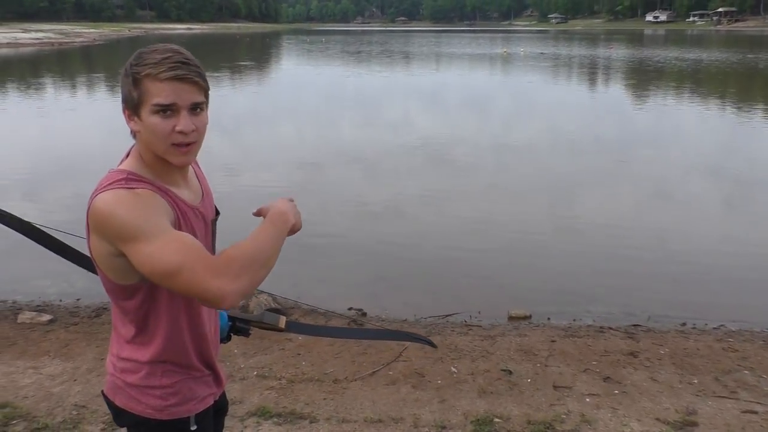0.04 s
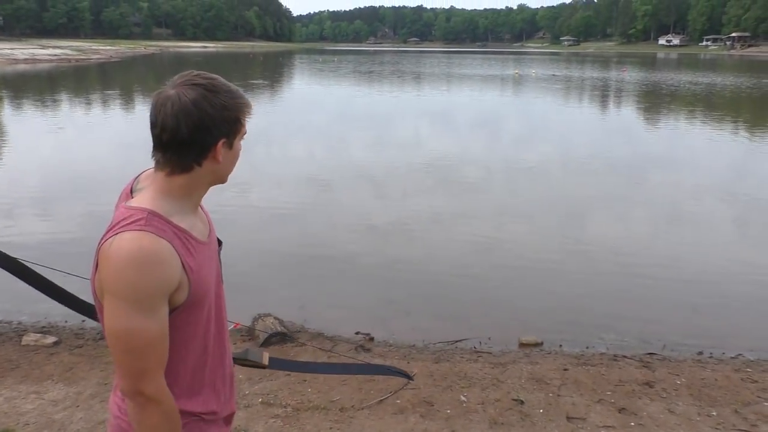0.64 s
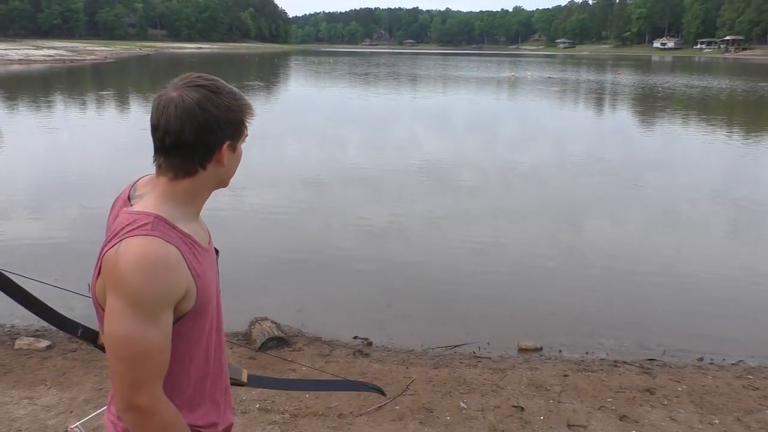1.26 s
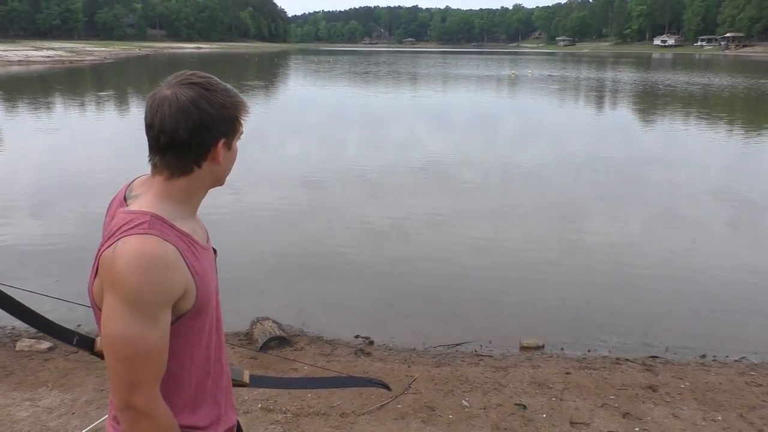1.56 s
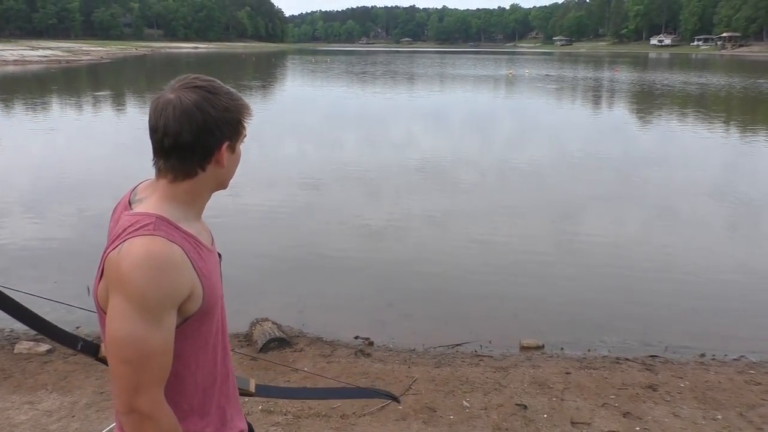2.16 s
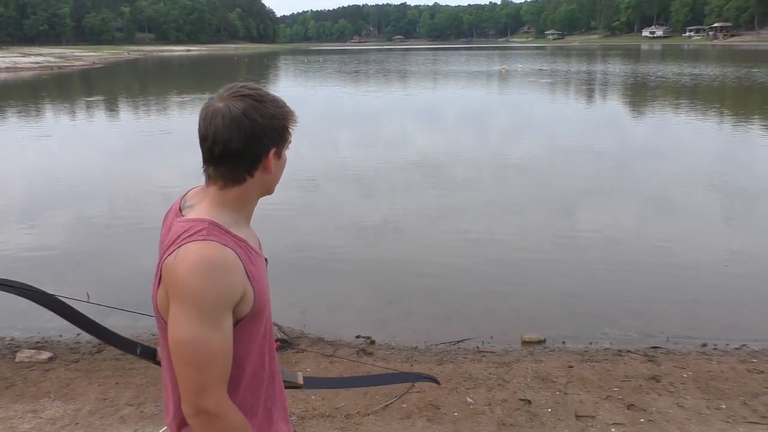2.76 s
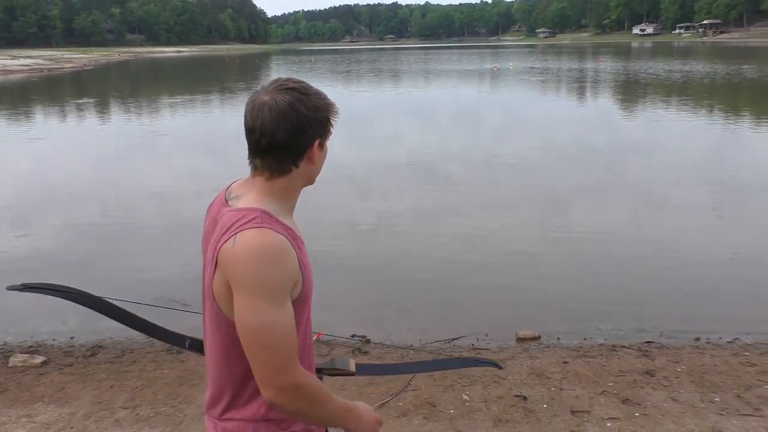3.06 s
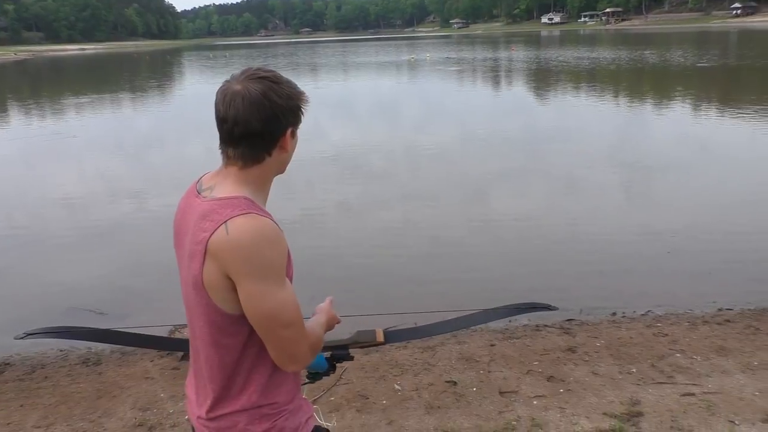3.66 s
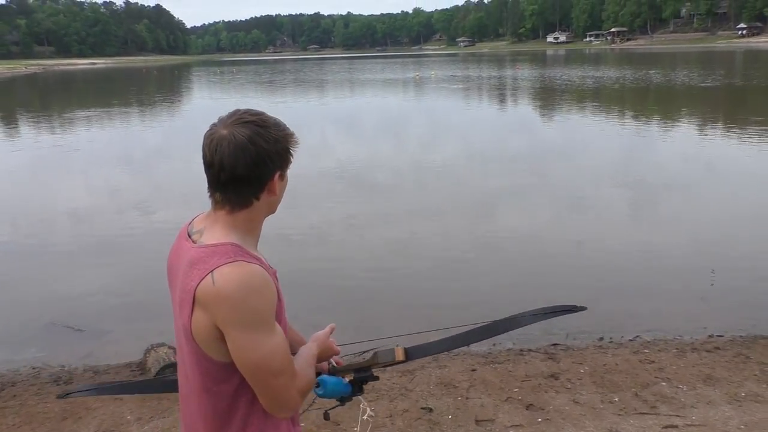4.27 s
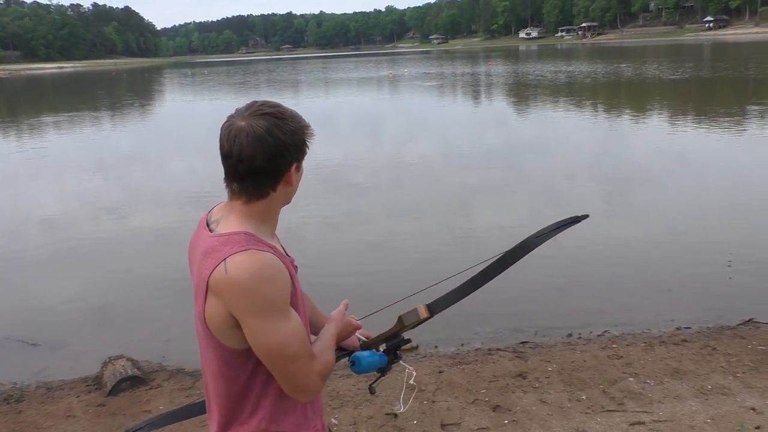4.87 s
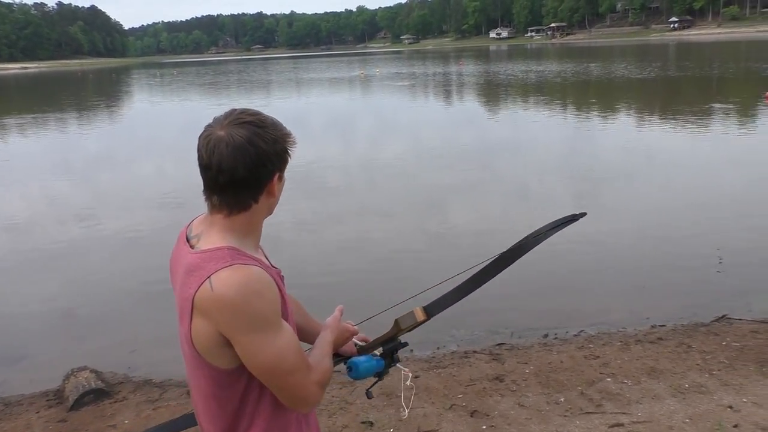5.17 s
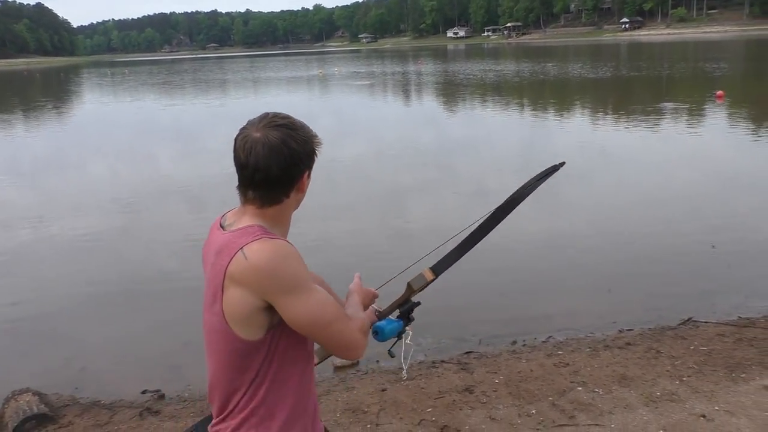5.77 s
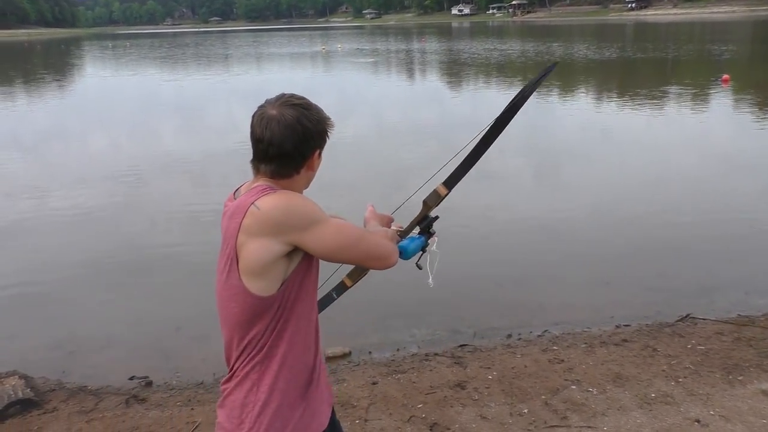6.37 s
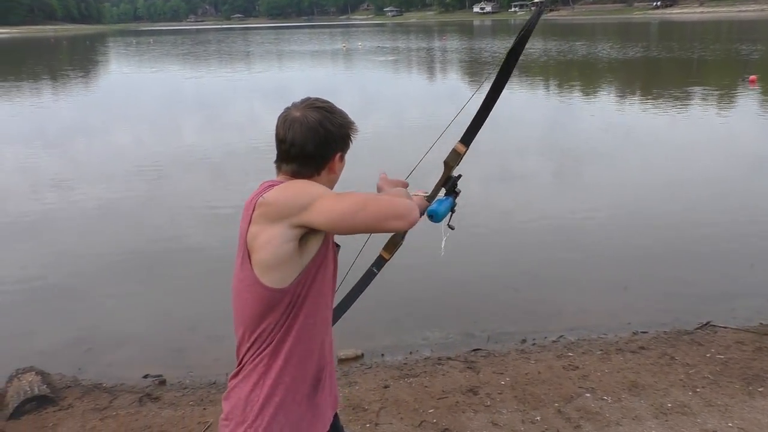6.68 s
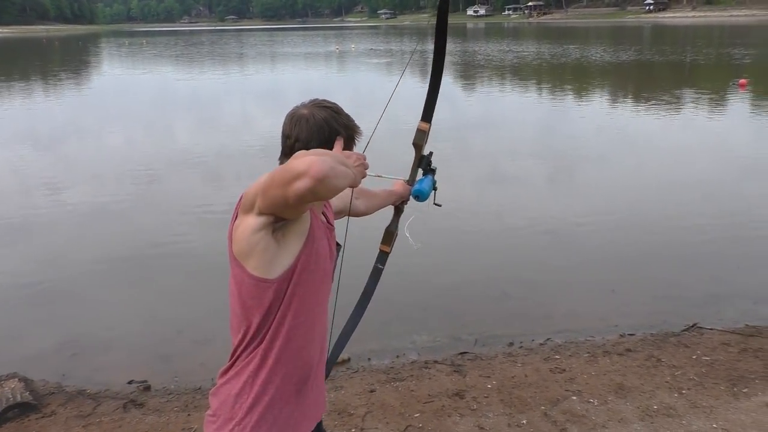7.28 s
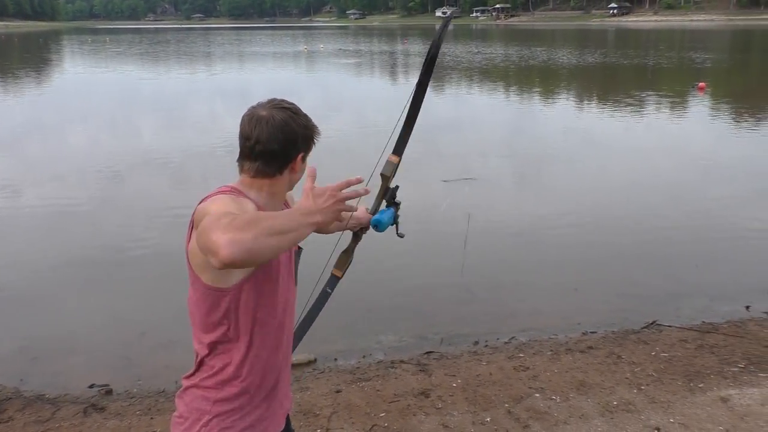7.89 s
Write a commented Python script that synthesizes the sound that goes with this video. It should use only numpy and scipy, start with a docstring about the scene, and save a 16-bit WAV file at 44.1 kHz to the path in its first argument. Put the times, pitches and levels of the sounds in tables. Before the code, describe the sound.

Short crow calls, faint birds and wind rumble, with close clicks from a bow's reel, ending in a sharp shot and whirring line.

```python
"""A lake shore: crows call with short nasal notes over a low rumble of wind, small birds and insects
behind them, and the trees and banks scatter the birds' calls back as echoes. Close by, an archer
handles a fishing bow, its reel clicking, then shoots. Friction makes the arrow scrape over the rest,
the string slaps home and excites the modes of the limbs, and the line whizzes off the reel,
each loop flicking the cover."""
import sys
import numpy as np
from scipy import signal
from scipy.fft import rfft, irfft, next_fast_len
from scipy.io import wavfile

SR = 44100
rng = np.random.default_rng(int(sys.argv[2]) if len(sys.argv) > 2 else 0)


def generate_wav(signal):
    """Clip the signal to [-1, 1] and save it as 16-bit WAV at the path in sys.argv[1]."""
    frames = np.transpose(np.atleast_2d(signal))
    scaled = np.clip(frames, -1, 1) * 32767
    pcm = np.round(scaled).astype(np.int16)
    wavfile.write(sys.argv[1], SR, pcm)


N = 349757
TIME = np.arange(N) / SR

# Spectrum of the reel's ticks and the line's scrapes. Each row: frequency in Hz, relative level in dB.
TICK_SPECTRUM = [(1000, -38), (3000, 0), (5500, 0.5), (7200, 1.5), (10000, 1.5), (14000, -1), (16000, -58)]


def gain_of(db):
    """Converts decibels to an amplitude ratio."""
    return 10 ** (np.asarray(db) / 20)


def unit_rms(x):
    """Normalises a signal to rms 1."""
    return x / np.sqrt(np.mean(x ** 2) + 1e-20)


def value_at(points, hz):
    """Interpolates rows of frequency and value on a log-frequency axis."""
    frequencies, values = np.transpose(points)
    return np.interp(np.log(hz + 1), np.log(frequencies + 1), values)


def envelope(rows):
    """Interpolates rows of time in seconds and level in dB into a gain for every sample."""
    return gain_of(np.interp(TIME, *np.transpose(rows)))


def add(mix, start_s, sound):
    """Superposition: sums a sound into the mix from its start time."""
    part = mix[round(start_s * SR):][:len(sound)]
    part += sound[:len(part)]


def impulse(spectrum, size=2048):
    """Minimum phase: the causal click of energy 1 that has this spectrum."""
    hz = abs(np.fft.fftfreq(size, 1 / SR))
    log_gain = np.log(gain_of(np.maximum(value_at(spectrum, hz), -100)))
    click = np.fft.ifft(np.exp(np.conj(signal.hilbert(log_gain)))).real
    return click / np.linalg.norm(click)


def filtered(x, spectrum):
    """Zero-phase filtering: weights each frequency of a full-length sound."""
    size = next_fast_len(N, real=True)
    response = gain_of(value_at(spectrum, np.fft.rfftfreq(size, 1 / SR)))
    return irfft(rfft(x, size) * response, size)[:N]


def noise(spectrum):
    """Stationary coloured noise of rms 1."""
    return unit_rms(filtered(rng.standard_normal(N), spectrum))


def drift(per_s):
    """Band-limited random modulation of rms 1."""
    points = rng.standard_normal(int(per_s * N / SR) + 4)
    return unit_rms(signal.resample(points, next_fast_len(N, real=True))[:N])


def burst(spectrum, decay_s):
    """A rough contact: impulses of random sign, decaying exponentially, coloured by a spectrum."""
    t = TIME[:SR // 10]
    contact = rng.choice([-1., 1.], len(t)) * np.exp(-t / decay_s)
    return signal.fftconvolve(contact, impulse(spectrum))


def stereo(x, side_db):
    """Partial coherence: left and right share a sound, plus a smeared copy in opposite polarity."""
    smear = burst([(2500, 4), (4500, -5), (8000, -3), (12500, -4), (16000, 4)], decay_s=0.0052)
    side = unit_rms(signal.fftconvolve(x, smear)[:N]) * np.std(x)
    return x + np.array([[1], [-1]]) * gain_of(side_db) * side


def scattered(x, scatter_s):
    """Scattering: trunks and leaves spread a sound's energy over time."""
    response = burst([(500, 0), (1400, -4), (4000, -4.5)], scatter_s)
    return signal.fftconvolve(x, response / np.linalg.norm(response))[:N]


def through_trees(x):
    """Multipath propagation: a voice deep in the wood arrives partly direct, partly scattered."""
    return gain_of(-1) * x + gain_of(-10) * scattered(x, scatter_s=.014)


def bank_echoes(x):
    """Diffuse reflection: the near and far banks each return a delayed, smeared copy."""
    # Each row: delay in seconds, gain in dB, scatter time in seconds.
    reflections = [(.008, -24.5, 0.014), (.062, -20.5, 0.011), (.31, -19, .016)]
    out = np.zeros(N)
    for delay, db, scatter_s in reflections:
        add(out, delay, gain_of(db) * scattered(x, scatter_s))
    return out


def shore_reverb(x, blend=0.9, build_s=0.024):
    """Reverberation: echoes from the trees build up, then decay at a different rate in each band."""
    # Each row: frequency in Hz, time to fall 60 dB in seconds.
    decay_times = [(300, 1.2), (1300, 1.25), (4000, 2.8), (10000, 1.3)]
    hz, t, bands = signal.stft(rng.standard_normal((2, SR)), SR, nperseg=256)
    decay = gain_of(-60 * t / value_at(decay_times, hz)[:, None])
    tail = signal.istft(bands * decay * (1 - np.exp(-t / build_s)), SR, nperseg=256)[1]
    tail += blend * (tail[::-1] - tail) / 2  # draws left and right towards their mean
    return signal.fftconvolve(x[None], tail / np.linalg.norm(tail[0]), axes=1)[:, :N]


def air_and_wind(wash_db=-58, wind_db=-57.5, rumble_trim_db=-1, throb_db=2):
    """Amplitude-modulated noise: a wash of far trees and water, low wind and a throbbing rumble."""
    # Three spectra. Each row: frequency in Hz, relative level in dB.
    wash_spectrum = [(100, -9), (280, -0.5), (420, -4.5), (600, -6.5), (800, -7), (950, 0.5), (1300, 1),
                     (1640, -8), (2000, -9.5), (2930, -13.5), (4500, -20), (6300, -30.5), (8300, -26),
                     (10500, -21.5), (13800, -19.5), (14600, -68)]
    wind_spectrum = [(20, -37), (40, -15.5), (70, -2.5), (110, -0.5), (160, -2), (260, -12.5), (420, -18),
                     (900, -72)]
    rumble_spectrum = [(70, -26), (120, -11), (175, -2.5), (220, -3), (260, -11.5), (310, -22),
                       (420, -22.5), (800, -64)]
    # The far rumble comes and goes. Each row: time in seconds, relative level in dB.
    rumble_levels = [(0.0, -52.5), (0.04, -49.5), (0.41, -47), (1.34, -54), (2.22, -57), (2.74, -48),
                     (3.39, -60), (5.14, -60), (5.85, -55.5), (7.75, -60.5)]
    # Stereo width. Each row: frequency in Hz, side level relative to mid in dB.
    width = [(60, -13), (150, -20.5), (380, -9.5), (950, -14.5), (2380, -4.5), (5980, -1), (15000, -35)]
    wash = gain_of(wash_db + drift(6.8))
    gust = gain_of(wind_db + drift(10))
    throb = envelope(rumble_levels) * gain_of(rumble_trim_db + throb_db * drift(28))
    mid, side = (wash * noise(wash_spectrum) + gust * noise(wind_spectrum)
                 + throb * noise(rumble_spectrum) for _ in range(2))
    return mid + np.array([[1], [-1]]) * filtered(side, width)


def insects(trill_hz=4480, pulses_per_s=44, sweep_hz=380, tone_hz=1948, tone_db=-69, chorus_db=-72.5):
    """Modulated tones: a far trill of uneven falling pulses, and a thin tone in a narrow hiss."""
    # The trill's strength. Each row: time in seconds, relative level in dB.
    trill_levels = [(0, -71), (2.1, -75), (2.6, -75.5), (6.4, -78), (6.8, -68.5), (7.9, -69)]
    # Far insects blur into a hiss. Each row: frequency in Hz, relative level in dB.
    chorus_spectrum = [(1650, -36), (1870, -1.5), (1960, -0.5), (2060, -7.5), (2300, -39)]
    cycle = np.cumsum(pulses_per_s * (1 + .12 * drift(50))) / SR % 1
    hz = trill_hz - sweep_hz * (cycle - .5) + 40 * drift(120)
    pulses = np.sin(np.pi * cycle) ** 2 * gain_of(1 + 2.3 * drift(40))
    trill = envelope(trill_levels) * pulses * np.sin(2 * np.pi * np.cumsum(hz) / SR)
    tone = np.sin(2 * np.pi * np.cumsum(tone_hz + 3 * drift(30)) / SR)
    tone *= gain_of(tone_db) * (1 + 0.25 * drift(70))
    return through_trees(trill) + tone + gain_of(chorus_db) * noise(chorus_spectrum)


def songbirds(chip_hz=(4300, 3180), waver_share=0.013, flutter_db=0.5, boost_db=8.5, edge_s=0.0062):
    """Frequency modulation: each falling chip or slurred whistle is one fluttering sine glide."""
    # Even runs of chips. Each row: start in seconds, number of chips, spacing and chip length in
    # seconds, relative level in dB, swell over the chip in dB.
    chip_runs = [(2.402, 3, .052, .024, -73, 5), (2.583, 4, .296, .04, -74, 14),
                 (6.284, 3, .052, .027, -73, -3), (7.166, 4, .135, .038, -75, 4)]
    # Each row: start and length in seconds, first and last pitch in Hz, relative level in dB.
    whistles = [(.91, 0.082, 3290, 3770, -72), (1.326, 0.033, 3830, 3100, -70),
                (1.375, .06, 3400, 2950, -79), (1.496, 0.033, 3120, 3500, -73),
                (1.78, 0.036, 3090, 3390, -77), (1.98, 0.017, 3720, 3050, -73),
                (2.057, 0.27, 3690, 1850, -76), (6.088, 0.19, 3210, 2900, -73),
                (7.333, 0.04, 3800, 3910, -74), (7.205, 0.065, 1870, 2230, -68),
                (7.507, 0.057, 1764, 2200, -67), (7.619, 0.051, 3850, 3950, -70)]
    out, waver, flutter = np.zeros(N), drift(440), drift(90)
    notes = [(start + k * spacing, length, *chip_hz, db, swell_db)
             for start, count, spacing, length, db, swell_db in chip_runs for k in range(count)]
    notes += [(*whistle, 0) for whistle in whistles]
    for start, length, first_hz, last_hz, db, swell_db in notes:
        t = TIME[:round(length * SR)]
        hz = np.geomspace(first_hz, last_hz, len(t))
        hz *= 1 + waver_share * waver[round(start * SR):][:len(t)]
        fade = np.minimum(np.minimum(t, t[::-1]) / edge_s, 1)
        swell = gain_of(db + swell_db * (t / length - .5))
        add(out, start, fade * swell * np.sin(2 * np.pi * np.cumsum(hz) / SR))
    return out * gain_of(boost_db - flutter_db * flutter)


def crows(scoop_share=0.0554, scoop_s=0.0276, droop_per_s2=48, jitter_share=0.0051, shimmer_db=0.86,
          onset_s=0.018, release_s=0.056, rasp_s=0.022, hoarse_db=-26):
    """Source and filter: a rasp clears into harmonics that arch in pitch under the throat's formants."""
    # Each row: time of the pitch peak, rise and fall in seconds, peak pitch in Hz,
    # relative level of the call in dB, relative level of its opening rasp in dB.
    calls = [(.511, .031, .06, 618, -49, -6), (.775, .042, .068, 770, -52.5, -3),
             (1.025, .04, .05, 699, -50, -3), (1.205, .035, .064, 626, -46.5, -6),
             (2.178, .03, .062, 616, -50, -5), (2.635, .047, .064, 775, -52, -4),
             (2.778, .05, .052, 686, -48.5, -3), (2.963, .03, .062, 657, -45.5, -4),
             (3.628, .028, .068, 736, -51.5, -3), (3.889, .026, .06, 654, -48.5, -5),
             (4.025, .04, .047, 704, -49, -2), (4.997, .02, .058, 634, -51.5, -1),
             (5.332, .05, .045, 694, -50, -4), (5.75, .03, .062, 635, -51, 1),
             (6.4, .04, .05, 720, -58.5, -4), (6.662, .03, .056, 628, -47.5, -6),
             (6.81, .05, .048, 703, -51, -3), (6.992, .05, .066, 776, -53, -2),
             (7.485, .028, .056, 602, -53, -5)]
    # The throat's response and the rasp's spectrum. Each row: frequency in Hz, relative level in dB.
    formants = [(520, -10.5), (640, -12.5), (780, -14.5), (1050, -2.5), (1260, 1.5), (1420, 1.5),
                (1550, -3.5), (1900, -22), (2300, -25), (3000, -37)]
    rasp_spectrum = [(700, -59), (1020, 11.5), (1200, 2.5), (1430, 12.5), (1750, -11), (3000, -48)]
    out, jitter, shimmer = np.zeros(N), drift(250), drift(200)
    rasp = noise(rasp_spectrum)
    for peak_s, rise, fall, peak_hz, db, rasp_db in calls:
        span = slice(round((peak_s - .1) * SR), round((peak_s + .1) * SR))
        t = TIME[span] - peak_s
        scoop = scoop_share * (1 - np.exp(-(t / scoop_s) ** 2))
        sag = np.where(t < 0, scoop, droop_per_s2 * t ** 2)
        pitch = peak_hz * (1 - sag) * (1 + jitter_share * jitter[span])
        phase = 2 * np.pi * np.cumsum(pitch) / SR
        attack = np.clip((t + rise + 0.0076) / onset_s, 0, 1)
        release = np.clip((fall + 0.011 - t) / release_s, 0, 1)
        swell = attack * release
        # Higher harmonics follow a higher power of the swell, so they fade first.
        voice = sum(gain_of(value_at(formants, k * pitch)) * swell ** (0.61 * k ** 1.06)
                    * np.sin(k * phase) for k in range(1, 5))
        voice *= gain_of(shimmer_db * shimmer[span])
        voice *= gain_of(0.46) / np.std(voice[(t > -rise) & (t < fall)])
        opening = gain_of(rasp_db - 1.7) * np.exp(-((t + rise - 0.00096) / rasp_s) ** 2)
        roughness = opening + gain_of(hoarse_db) * swell
        out[span] += gain_of(db) * (voice + roughness * rasp[span])
    return out


def tick(tilt_db_per_octave, pivot_hz=7000, shiver_db=-16, rattle_db=-34):
    """Impact on a small part: a sharp click, a brief shiver and a faint after-rattle."""
    spectrum = [(hz, db + tilt_db_per_octave * np.log2(hz / pivot_hz)) for hz, db in TICK_SPECTRUM]
    out = gain_of(shiver_db) * burst(spectrum, decay_s=0.0011)
    out += gain_of(rattle_db) * burst(spectrum, decay_s=0.0091)
    add(out, 0, impulse(spectrum))
    return out


def bow_handling(tick_trim_db=-1, body_db=-27, grain_db=3, faint_ticks_per_s=12, faint_tick_db=17.5):
    """Friction and small impacts: cloth rustles, the reel ticks, the arrow knocks, the line scrapes."""
    # Clothes and line rustle as the archer moves. Each row: time in seconds, level in dB.
    rustle_levels = [(0, -60), (.4, -64), (.6, -71), (3.15, -68.5), (3.5, -64.5), (4.05, -59.5), (4.3, -60),
                     (4.86, -62.5), (4.94, -60), (5.22, -60.5), (5.7, -61.5), (6.06, -57), (6.35, -64),
                     (7.7, -67.5)]
    # Two spectra. Each row: frequency in Hz, relative level in dB.
    rustle_spectrum = [(400, -23), (1500, 14), (2600, 7.5), (4000, 0), (6500, -5.5), (11000, -2.5),
                       (14000, -12), (16000, -58)]
    knock_spectrum = [(300, -10), (900, -5.5), (1400, 4), (2800, -2.5), (4200, -10), (6000, -33),
                      (12000, -19), (15000, -48)]
    # Reel and line tick. Each row: start in seconds, relative level in dB, tilt in dB per octave.
    ticks = [(0.3073, -37.5, 1), (.3894, -31, -6), (.4593, -35, 7), (0.567, -33.5, -6), (1.1198, -38, -2),
             (3.4143, -34.5, 4), (3.4676, -31, 9), (3.559, -33.5, 11), (3.7491, -32, 13), (3.97, -32, -0.5),
             (4.0605, -26.5, 4), (4.124, -35, 2), (4.3483, -32.5, -4), (4.4524, -37, -6), (4.568, -38, 4),
             (5.0014, -26.5, -3), (5.0429, -26.5, -5), (5.0502, -31, -2), (5.0688, -30, -1),
             (5.0906, -30, -2), (5.101, -29.5, 5), (5.1062, -22, .3), (5.114, -28, -4), (5.126, -30, -6),
             (5.1294, -27, 1), (5.1478, -25, 3.5), (5.236, -34, 2), (5.2694, -25, 1.5), (5.336, -29, 7),
             (5.3457, -31.5, 3), (5.3592, -23.5, 1), (5.3934, -26.5, 3), (5.4164, -26.5, -0.5),
             (5.4219, -37, 3), (5.8076, -33, -1), (6.013, -34, 11), (6.0424, -36, 8), (6.4083, -36, 16),
             (6.667, -38, 4), (6.766, -37, 15)]
    # Arrow and hand knock on the bow. Each row: start in seconds, level in dB, decay in seconds.
    knocks = [(2.592, -46.5, .005), (4.17, -43.5, 0.0088), (4.4535, -43, 0.0022), (4.935, -47, 0.0081),
              (5.001, -48, .003), (5.079, -46.5, 0.0046), (5.1153, -43, .0015), (5.1255, -36, 0.0013),
              (5.1295, -36, 0.0012), (5.148, -44, .001), (5.2, -51, 0.0061), (6.008, -43, 0.014),
              (6.041, -42.5, 0.011), (6.075, -50, 0.017), (6.757, -51.5, 0.011), (6.961, -49, .007)]
    # The line rubs over the reel. Each row: centre and half length in seconds, level in dB.
    scrapes = [(.372, 0.013, -63), (3.982, .014, -62), (4.061, 0.024, -57), (4.937, .013, -54),
               (4.976, 0.029, -61), (5.054, 0.052, -62), (5.361, 0.0037, -53)]
    motion = envelope(rustle_levels)
    out = motion * noise(rustle_spectrum) * unit_rms(gain_of(grain_db * drift(350)))
    for start, db, tilt in ticks:
        click = tick(tilt) + gain_of(body_db) * burst(knock_spectrum, decay_s=0.0045)
        add(out, start, gain_of(db + tick_trim_db) * click)
    for start, db, decay_s in knocks:
        add(out, start, gain_of(db) * burst(knock_spectrum, decay_s))
    scraping = sum(gain_of(db) * np.exp(-((TIME - centre) / half) ** 2) for centre, half, db in scrapes)
    out += scraping * noise(TICK_SPECTRUM) * unit_rms(gain_of(grain_db * drift(990)))
    # Faint random ticks grow denser and louder with the rustle.
    struck = rng.random(N) < faint_ticks_per_s / SR * (motion / motion.max()) ** 2
    faint = struck * motion * gain_of(faint_tick_db + 3 * rng.uniform(-0.43, 1, N))
    return out + signal.fftconvolve(faint, tick(0))[:N]


def bow_shot(loose_s=7.7925, leave_s=7.8165, stop_s=0.0026, slide_db=-27, chatter_db=2, pluck_db=-18,
             catch_ring_db=-29, slap_ring_db=-23):
    """Friction, then impact: the arrow scrapes the rest, the string stops dead, the limbs' modes ring."""
    # Spectra of the arrow on the rest, the string slipping off the fingers and the string's blow.
    # Each row: frequency in Hz, relative level in dB.
    scrape_spectrum = [(88, -53), (150, -36), (398, -7), (774, -23), (1260, -3), (2810, 2.5), (3220, -7),
                       (3920, 3.5), (4410, -7), (6640, -4), (7180, -8), (7920, 1.5), (8900, -4), (9820, 3),
                       (16000, -17)]
    pluck_spectrum = [(120, -31), (300, -3), (400, -2), (520, -10), (800, -28), (3000, -39)]
    blow_spectrum = [(40, -47), (120, -25), (300, -17), (750, -19), (1150, 6.5), (1700, 3), (2300, 10.5),
                     (2900, -7), (3800, -5), (5000, -26), (12000, -32)]
    # Each row: frequency in Hz, relative level in dB, time to fall 60 dB in seconds.
    bow_modes = [(115, -25, 0.28), (267, -21, 0.32), (350, -20, 0.23), (562, -21, 0.33), (1160, -2, 0.098),
                 (1360, -3, 0.092), (1530, -7, .07), (1775, 6, 0.083), (1965, -14, .04), (2230, -9, 0.061),
                 (2443, 0, 0.07), (2703, -4, 0.07), (2912, 11, 0.083), (3766, -6, 0.066)]
    # The arrow catches on the rest. Each row: start in seconds, level in dB, decay in seconds.
    catches = [(7.7989, -12.5, 0.0012), (7.8089, -18, 0.0012), (7.817, -19, 0.001)]
    # The string slaps home and rebounds. Each row: start in seconds, peak level in dB.
    slaps = [(7.817, -12.5), (7.81785, -14), (7.8223, -25)]
    speed = np.clip((TIME - loose_s) / (leave_s - loose_s), 0, 1)
    friction = gain_of(slide_db) * speed ** 0.31 * np.exp(-np.maximum(TIME - leave_s, 0) / stop_s)
    out = friction * noise(scrape_spectrum) * unit_rms(gain_of(chatter_db * drift(900)))
    add(out, loose_s, gain_of(pluck_db) * impulse(pluck_spectrum))
    t = TIME[:SR // 2]
    ring = sum(gain_of(db - 60 * t / t60) * np.sin(2 * np.pi * hz * t) for hz, db, t60 in bow_modes)
    for start, db, decay_s in catches:
        add(out, start, gain_of(db) * burst(scrape_spectrum, decay_s))
        add(out, start, gain_of(db + catch_ring_db) * ring)
    blow = impulse(blow_spectrum)
    for start, db in slaps:
        add(out, start, gain_of(db) * blow / abs(blow).max())
        add(out, start, gain_of(db + slap_ring_db) * ring)
    return out


def line_runout(start_s=7.82, loops_per_s=290, flick_db=12, jerk_db=9, jerk_s=0.012, slap_s=7.887,
                slap_db=8.9, whirr_db=-38.5, whirr_rise_s=0.0016, whizz_db=-39, whizz_rise_s=0.013):
    """Pulse-modulated noise: the line jerks taut, then each loop leaving the spool flicks the cover."""
    # The low whirr and the high whizz. Each row: frequency in Hz, relative level in dB.
    whirr_spectrum = [(120, -61), (200, -35), (276, -17), (308, -21), (408, -7.5), (564, -9.5), (812, -29),
                      (880, -7.5), (2260, -1.5), (5000, -11), (6500, -19), (11000, -120)]
    whizz_spectrum = [(2940, -43), (5000, -21), (6380, -8), (7000, -14), (7600, -6), (9100, -4), (10100, 4),
                      (12300, -10), (14600, -7), (16000, -21)]
    age = np.maximum(TIME - start_s, 0)
    cycle = np.cumsum(loops_per_s * (1 + 0.25 * drift(300))) / SR % 1
    flicks = unit_rms(gain_of(flick_db * np.exp(-cycle / 0.18) + 3 * drift(400)))
    slap = np.exp(-((TIME - slap_s) / 0.0051) ** 2)  # the line hits the reel's cover harder once
    whirr = np.minimum(age / whirr_rise_s, 1) * gain_of(whirr_db + jerk_db * np.exp(-age / jerk_s))
    whirr *= noise(whirr_spectrum) * unit_rms(np.sqrt(flicks))
    whizz = np.minimum(age / whizz_rise_s, 1) * gain_of(whizz_db + slap_db * slap)
    whizz *= noise(whizz_spectrum) * flicks
    return whirr + whizz


def scene(crow_reverb_db=-15, song_reverb_db=-10):
    """Direct and reverberant sound: birds echo from the far trees; the archer stands close and dry."""
    caws, song = crows(), through_trees(songbirds())
    reverb = shore_reverb(gain_of(crow_reverb_db) * caws + gain_of(song_reverb_db) * song)
    birds = stereo(caws + song + bank_echoes(caws + song), side_db=-16)
    wildlife = birds + reverb + stereo(insects(), side_db=-10.5)
    wildlife *= gain_of([[.7], [-.7]])  # slightly to the left
    archer = stereo(bow_handling() + bow_shot() + line_runout(), side_db=-20.5)
    return air_and_wind() + wildlife + archer


def record(dry, cutoff_hz=15650):
    """Band limiting: a steep linear-phase low-pass filter removes the highest treble."""
    lowpass = signal.firwin(301, cutoff_hz, window=("kaiser", 9), fs=SR)
    return signal.oaconvolve(dry, lowpass[None], "same")


dry = scene()
out = record(dry)
generate_wav(out)
```